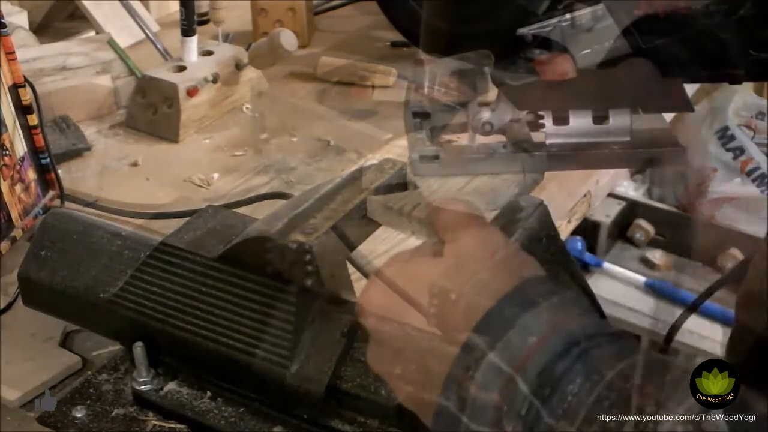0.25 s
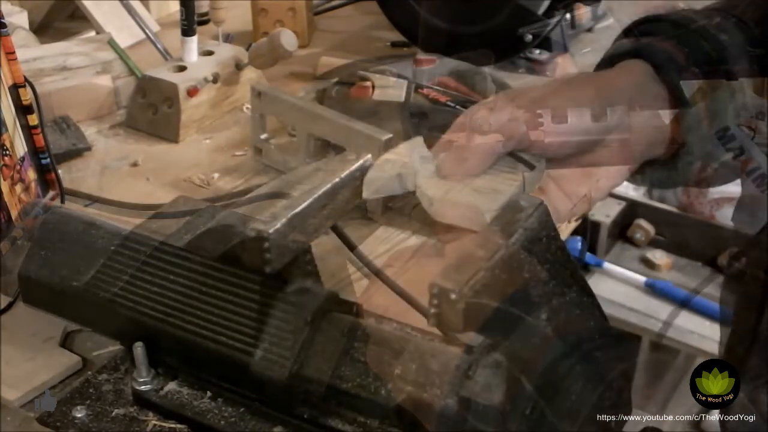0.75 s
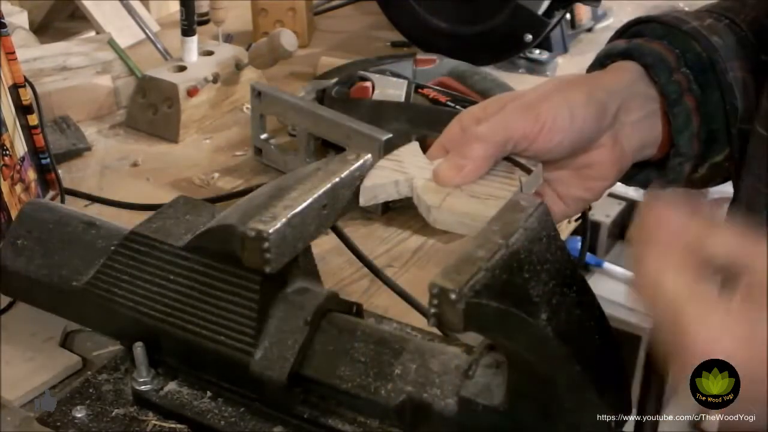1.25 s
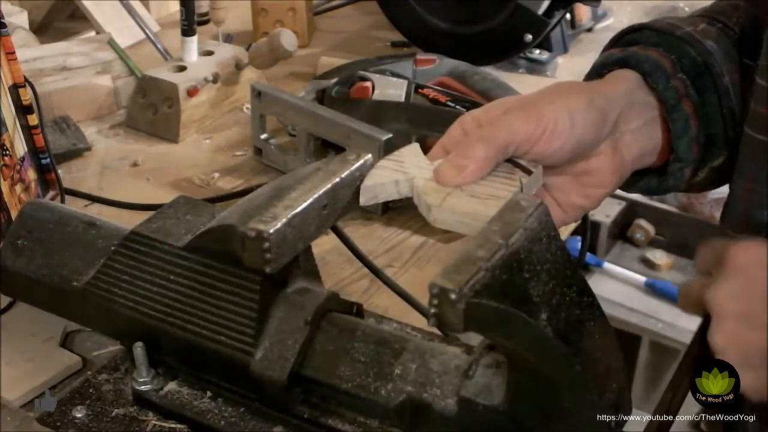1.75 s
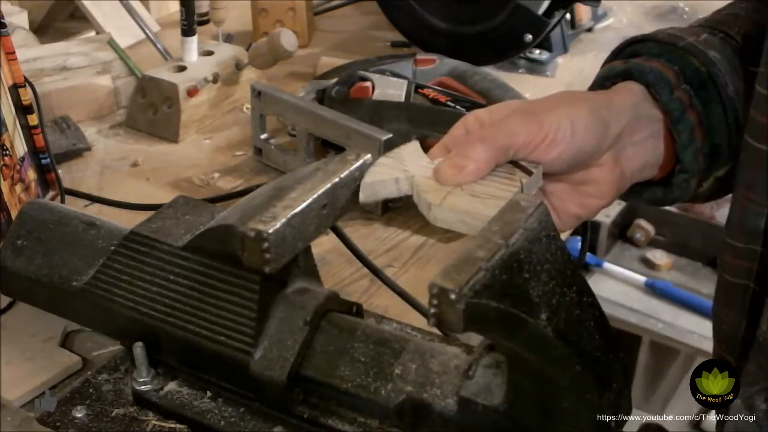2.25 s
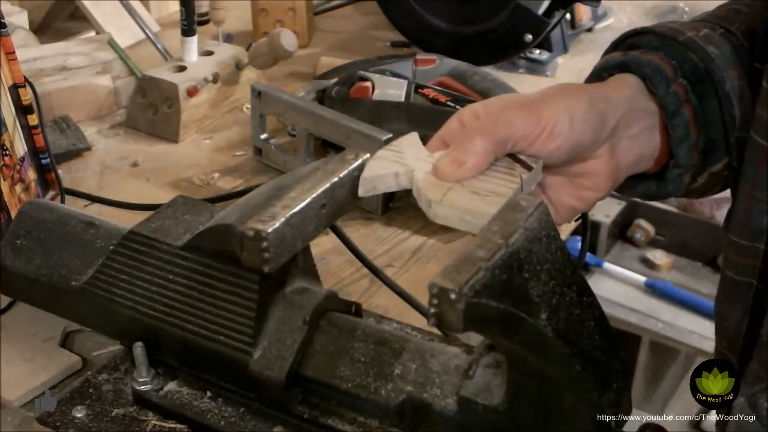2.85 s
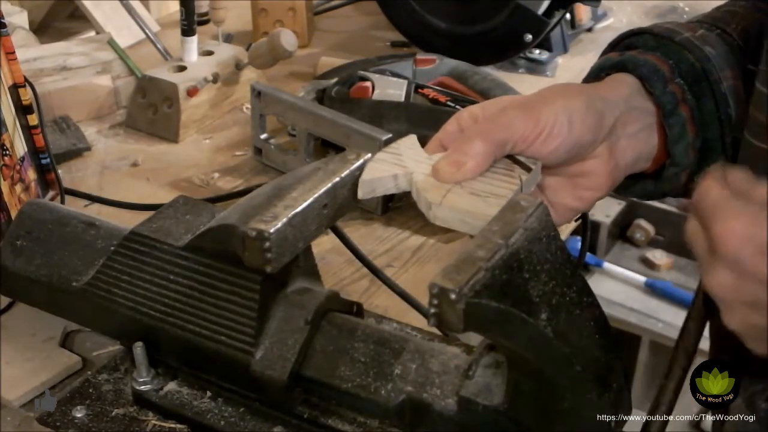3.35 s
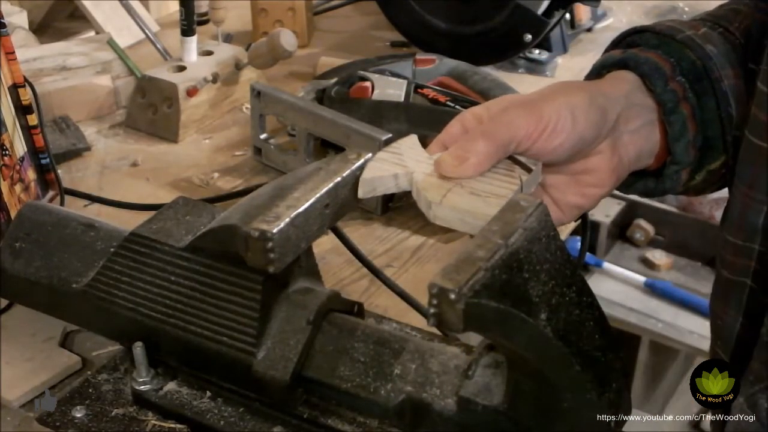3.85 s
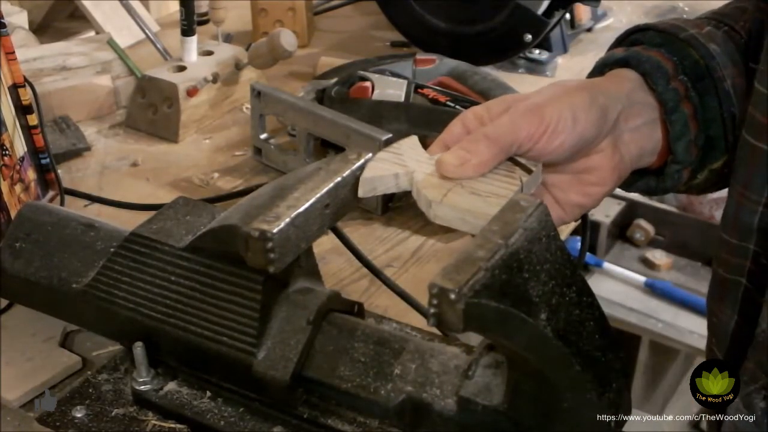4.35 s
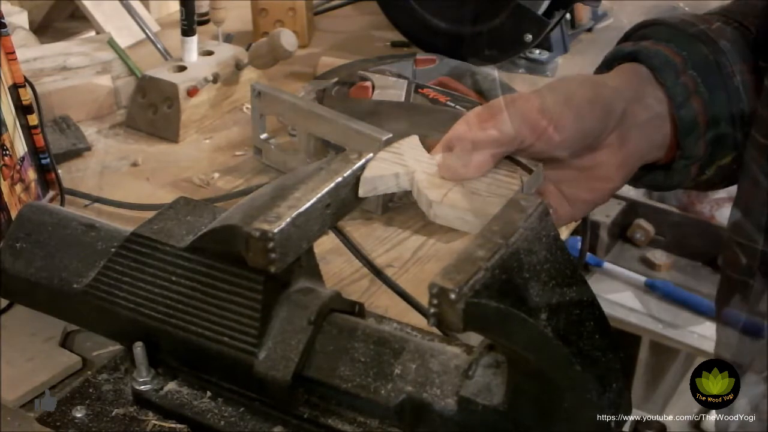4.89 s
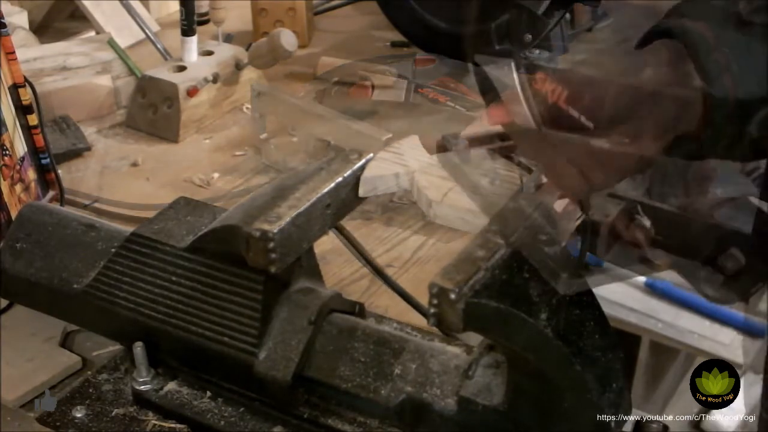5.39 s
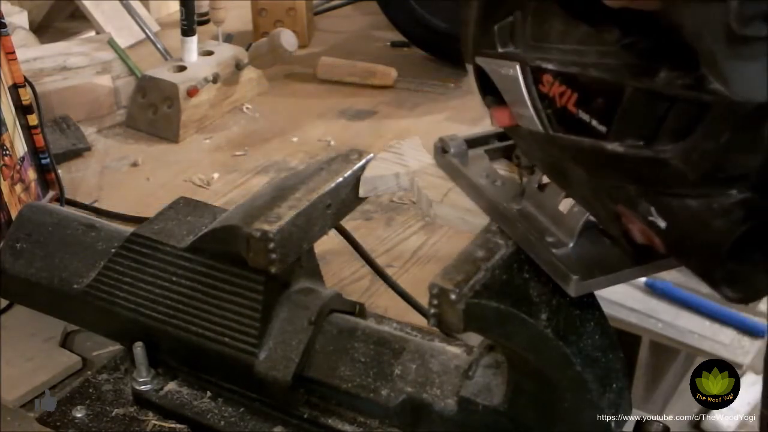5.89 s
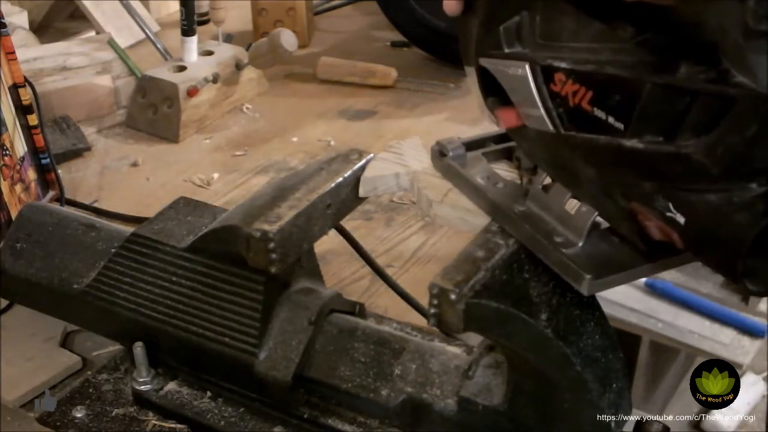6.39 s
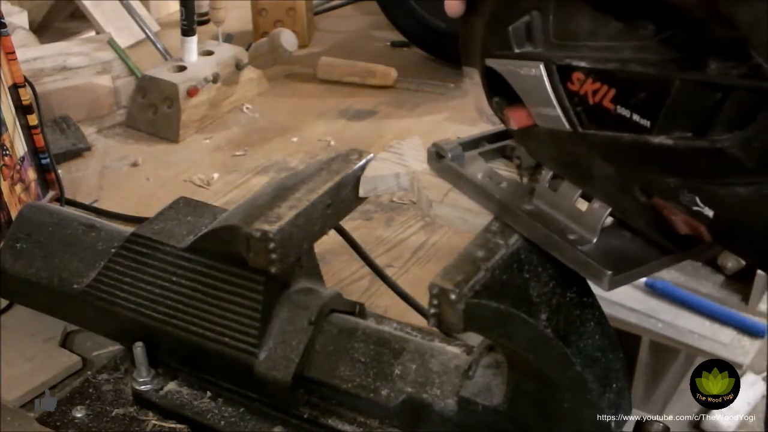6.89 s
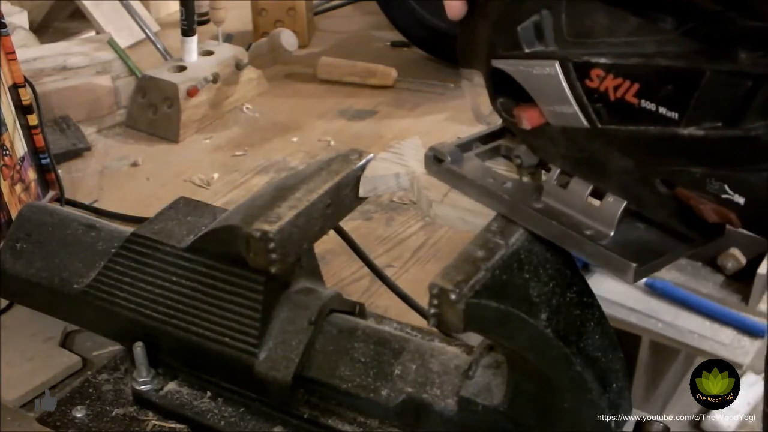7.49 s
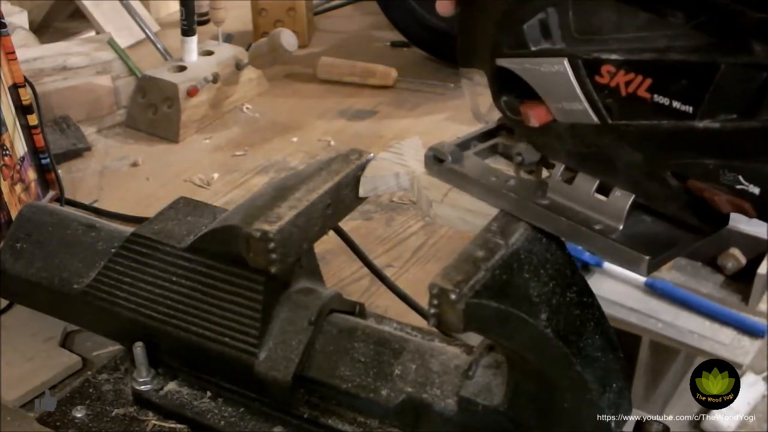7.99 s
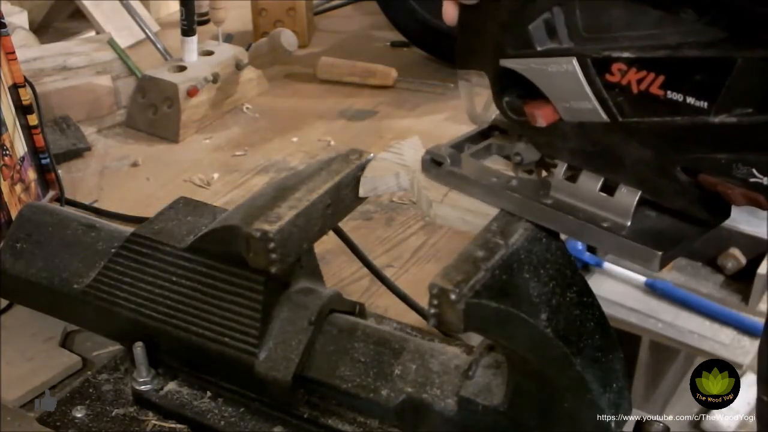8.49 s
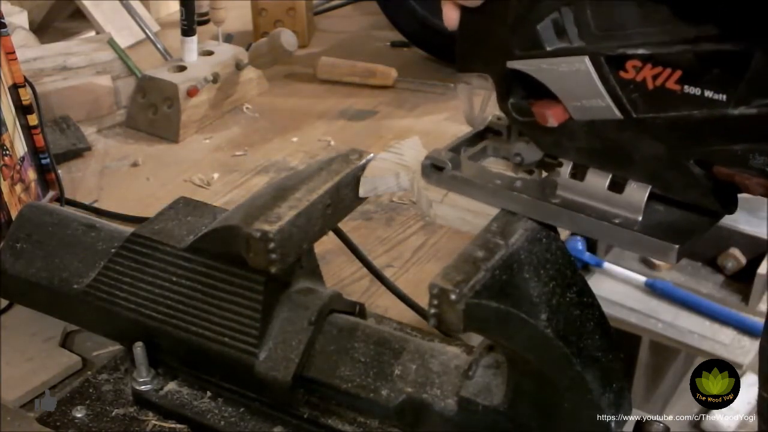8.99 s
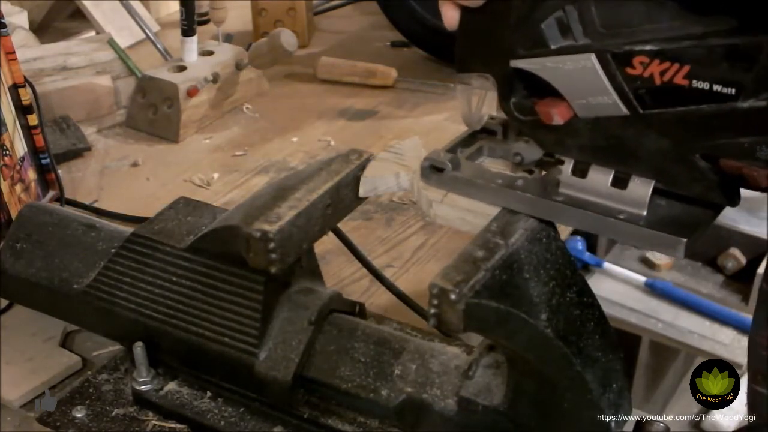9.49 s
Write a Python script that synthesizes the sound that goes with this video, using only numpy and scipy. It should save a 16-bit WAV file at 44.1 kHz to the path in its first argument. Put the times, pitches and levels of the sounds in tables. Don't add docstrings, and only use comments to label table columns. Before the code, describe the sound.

An electric jigsaw bites through thin wood and fades out within a second. In a quiet small workshop, hands tighten a bench vice: dry thread rasps, wood rustles, and several metallic knocks ring briefly. The jigsaw then fades in running free, whining and clattering, its pitch sagging and rising twice as the trigger is released and pulled. Close stereo microphone, work slightly to the right, short room reflections.

```python
import sys
import numpy as np
from scipy import signal
from scipy.fft import rfft, irfft, next_fast_len
from scipy.io import wavfile
from scipy.ndimage import uniform_filter1d, map_coordinates

SR = 44100
rng = np.random.default_rng(int(sys.argv[2]) if len(sys.argv) > 2 else 0)


def natural_amplitude(level_db):
    exponent = np.asarray(level_db, float) / 20
    return 10 ** exponent


def store_wav(level_fs):
    pcm = np.round(np.clip(np.atleast_2d(level_fs), -1, 1) * 32767)
    wavfile.write(sys.argv[1], SR, pcm.T.astype(np.int16))


N = 429534
SIZE = next_fast_len(N + SR)
FREQ = np.maximum(np.arange(SIZE // 2 + 1) * SR / SIZE, 1)
TIME = np.arange(N) / SR

# (frequency [Hz], level [dB per Hz])
AIR = [(21, -41), (35, -10), (58, -5.5), (90, -7.5), (238, -5.5), (350, -6.5), (475, -7.5), (663, -7.5),
       (1050, -9), (1320, -10.5), (2150, -12), (2380, -13), (3000, -15.5), (4630, -19), (15800, -29.5)]
# (frequency [Hz], level [dB])
LAMP = (13550, -90)
# (frequency [Hz], left minus right [dB], share heard alike [0-1])
PORTS = [(100, -.7, .85), (300, -2.7, .95), (800, -4.5, .93), (2000, -8, .74), (3500, -5, .62),
         (7000, -2, .62), (14000, 0, .6)]
# (loudest time [s], level [dB], rise [dB per s])
RUBS = [(1.23, -60, 400), (1.74, -54.5, 264), (1.87, -54, 400), (2.22, -68, 200), (2.31, -60, 1500),
        (3.035, -61, 264), (3.52, -57, 2000), (3.56, -63, 400), (4.6, -60, 600)]
# (time [s], length [s], rasp level [dB])
TURNS = [(1.9, 1.8, -65), (1.995, 0.098, -66), (2.201, 0.046, -66), (2.303, 0.022, -55), (2.46, 0.16, -66),
         (2.578, 0.07, -61), (2.683, 0.042, -56), (2.746, 0.1, -73), (2.854, 0.18, -59),
         (3.113, 0.099, -60), (3.231, 0.1, -57), (3.355, 0.21, -68), (3.66, 0.23, -65), (3.928, 0.23, -63),
         (4.241, 0.08, -61.5), (4.368, 0.028, -62)]
# (frequency [Hz], width [Hz], level [dB])
THREAD = [(2480, 350, 4), (4190, 1600, 5), (4550, 500, 0.5), (5840, 670, 0), (9600, 750, -3),
          (12600, 4000, -10.5)]
# (time [s], peak [dB], loudest ring [Hz], treble share [dB], vice share [dB])
KNOCKS = [(0.986, -44.5, 795, -36, 3), (1.208, -34.5, 680, -11, -7.5), (1.31, -48.5, 840, -12, -6),
          (1.826, -30, 720, -4.5, -2), (1.98, -41, 820, -11, -7), (2.226, -56, 2480, -8, -12),
          (2.302, -48.5, 450, -12, 2), (2.324, -48, 800, -11, 2), (2.364, -58, 880, -14, 0),
          (2.568, -41.5, 776, -13, 2.5), (3.029, -56, 347, -12, -2), (3.512, -53, 398, -11, 6.5),
          (4.088, -30.5, 1220, -6.5, 0.5), (4.587, -47.5, 218, -14, -3.5)]
# (frequency [Hz], width [Hz], level [dB])
VICE = [(263, 53, 3.5), (405, 101, 12.5), (564, 196, 7.5), (768, 220, 6), (1020, 120, -31)]
# (frequency [Hz], width [Hz], level [dB])
HANDLE = [(1760, 150, 9), (2024, 440, 9), (2360, 540, 5.5), (3180, 580, 5), (3940, 270, -3),
          (4270, 460, -2), (6840, 1100, -13)]
CHIMES = [
    (1.209, -46, [(540, -4, .06), (797, -5, .26), (1658, -14, .3), (1900, -3, .06), (2073, -18, .25), (2460, -14, .1), (3600, -6, .04), (3960, -9, .22), (4400, -10, .04)]),
    (1.31, -58, [(1500, -2, .06), (2930, 0, .1)]),
    (1.826, -42, [(361, -6, .4), (802, 0, .25), (1114, -14, .3), (1750, -10, .3), (2449, -12, .2), (3144, -13, .25), (3350, -2, .05), (3700, -8, .05), (4549, -17, .4)]),
    (4.089, -41, [(366, -12, .3), (533, -4, .15), (1040, -6, .3), (1238, 0, .08), (2110, -17, .2), (2455, -12, .3), (2923, -16, .2), (3700, -16, .15), (4600, -18, .15)]),
]
# (time [s], level [dB], frequency [Hz], 60 dB decay [s])
THUDS = [(1.21, -62, 151, 0.44), (1.826, -64, 168, 0.25), (4.089, -62, 196.6, .3), (4.6, -71, 70.6, 0.63)]
# (time [s], shaft speed headed for [turns per s], time to close 63% of the gap [s])
TRIGGER = [
    (0, 325, 1),
    (.14, 421, .35),
    (1.04, 60, 1.6),
    (4.115, 401, .25),
    (5.44, 60, 1.6),
    (6.27, 409.5, .265),
    (8.25, 60, 1.5),
    (8.98, 402, .26),
]
# (time [s], change [percent])
SURGE = [(5.4, 0), (5.6, -.25), (5.78, 0), (6.05, .55), (6.24, .2), (6.36, .8), (6.5, .2), (6.62, -.4),
         (6.85, -.5), (7.08, 0), (7.4, .1), (7.9, -.15), (8.2, 0), (8.28, .25), (8.42, -.25), (8.76, .75),
         (8.92, .45), (9.1, 1.4), (9.24, .7), (9.48, -.35), (9.74, -.9)]
# (time [s], level [dB])
NEARER = [(0, 1), (.5, -2.5), (5, -0.5), (6.2, 0.5), (7.6, -1), (8.6, -1.5), (9.3, 0), (9.74, -0.5)]
# (time [s], level [dB])
FACING = [
    [(0, -10), (.3, -3), (.6, -1), (1.04, -4)],
    [(4.4, -10), (5, -5), (5.9, -1), (6.4, -2), (6.75, -5), (7.2, 0), (8.3, -1), (9, -2), (9.74, -1)],
]
# (frequency [Hz], level [dB per Hz])
HOUSING = [(59, -56), (100, -24.5), (140, -31), (219, -23.5), (379, -13), (478, -15.5), (800, -13.5),
           (1010, -14.5), (1440, -5.5), (2050, -1), (2280, -2.5), (3320, -6.5), (6070, -11.5), (7000, -11),
           (9100, -19), (15400, -120)]
# (frequency [Hz], width [Hz], level [dB])
RINGS = [(776, 290, 4.5), (1480, 220, 1), (2200, 200, 0.5), (3290, 180, 2.5)]
# (frequency [Hz], level [dB per Hz])
FAN = [(2600, -26), (4500, -7.5), (6400, -15), (7100, -8.5), (10200, -5), (12700, -4), (14600, -9.5),
       (15700, -15)]
# (multiple of shaft speed, level [dB], best radiated [Hz], width [Hz])
WHINE = [(1, -19, 405, 50), (2, -24, 815, 70), (4, -8.5, 1640, 300), (5, -9, 1950, 900)]
# (multiple of shaft speed, level [dB], best radiated [Hz], width [Hz])
BARS = [(12, -16, 4500, 1400), (24, -13, 7000, 1300), (36, -14.5, 13200, 7000), (48, -15, 14500, 2400)]
# (time [s], fourth multiple [dB], fifth multiple [dB], sole-plate buzz [dB])
MESH = [
    [(0, -8, 7, -15), (.25, 6, 6, -18), (.4, 3, 4, -15), (.7, -3, 1, -11), (1.04, 11, 6, 0)],
    [(4.4, 2, -8, -23), (5.1, -4, 3, -25), (5.4, 0, 2, -18), (5.65, 3, -1, -20), (5.9, -3, 5, -28),
     (6.15, 0, -4, -26), (6.5, 6, 5, -24), (6.8, -2, -1, -12), (6.97, -6, 5, -13), (7.2, 0.5, 5.5, -19),
     (7.6, 3, 3.5, -13), (8.2, 5, 0.5, -9), (8.45, -1, 0, -18), (8.8, 1, 1, -24), (9.1, 4, 2, -15),
     (9.4, 2.5, -1, -7), (9.74, -2, 3, -11)],
]
# (time [s], twelfth multiple [dB], thirty-sixth multiple [dB])
BRUSHES = [
    [(0, -2, -3), (.4, 2, 3), (.75, 4, 3), (1.04, -2, -2)],
    [(4.4, 3, 2), (5.1, 7, 2), (5.3, 0, 0), (5.55, 0, 3), (6, -6, 0), (6.45, 2, 3), (6.8, 6, 7),
     (7.05, 0, 5), (7.35, -9, 6), (7.7, -8, -2), (8.2, -2, -5), (8.5, -5, 0), (8.8, -7, 2), (9.2, -6, -2),
     (9.74, -7, -7)],
]
# (frequency [Hz], width [Hz])
PLATE = (2070, 160)
# (multiple of stroke rate, level [dB])
SHAKE = [(1, -41), (2, -42), (3, -41), (4, -44), (5, -40.5), (6, -40.5), (7, -41), (8, -39.5)]
# (frequency [Hz], width [Hz], level [dB])
BENCH = (108, 12, 10)
# (time [s], bite over the housing [dB])
BITE = [
    [(0, -10), (.08, -4), (.2, 0), (.33, -1), (.43, -6), (.55, -11), (1.04, -13)],
    [(4.4, -16), (6.3, -16), (7.5, -16), (9, -16), (9.74, -15)],
]
# (frequency [Hz], width [Hz], level [dB])
BLADE = [(1466, 370, -0.5), (1760, 300, 4), (2820, 1080, 1), (5520, 780, -2.5), (6560, 1500, -10.5)]
# (time [s], place in the stroke [0-1], upper end [dB], lower end [dB], over the housing)
CLACKS = [
    [(0, .11, -13, -14), (.25, .13, -8, -13), (.4, .13, -10, -13), (.6, .14, -12, -10),
     (1.04, .15, -14, -11)],
    [(4.4, .965, -6, -9), (5.6, .965, -8, -12), (6.2, .99, -9, -10), (6.6, .99, -9.5, -11),
     (7.3, .97, -9, -15), (8.2, .96, -9, -16), (8.5, .98, -8, -11), (9, .99, -9, -11),
     (9.74, .99, -10.5, -15)],
]
# (frequency [Hz], width [Hz], level [dB])
YOKE = [(1660, 840, -2), (2900, 2400, 1), (4210, 2200, -1.5), (7900, 1800, -1.5), (11500, 6500, -4)]

STROKES_PER_TURN = 5 / 46
FULL_HZ = 400


def unit(x):
    return x / np.sqrt(np.mean(x ** 2))


def noise():
    return rng.standard_normal((3, N))


def walk(rate):
    k = int(SR / rate)
    steps = np.repeat(rng.standard_normal(N // k + 1), k)
    return 1.32 * uniform_filter1d(uniform_filter1d(steps, k), k)[:N]


def ramp(start, length):
    return np.clip((TIME - start) / length, 0, 1)


def play(tables, k, silent=-120):
    out = np.full(N, float(silent))
    for rows in map(np.array, tables):
        inside = (TIME >= rows[0, 0]) & (TIME <= rows[-1, 0])
        out[inside] = np.interp(TIME[inside], rows[:, 0], rows[:, k])
    return out


def along(table, k=1):
    rows = np.array(table)
    return np.interp(np.log(FREQ), np.log(rows[:, 0]), rows[:, k])


def shape(x, gain):
    return irfft(rfft(x, SIZE) * gain, SIZE)[..., :N]


def ring(hz, width):
    return 1 / (1 + 1j * (FREQ / hz - hz / FREQ) * hz / width)


def rings(modes):
    return sum(natural_amplitude(db) * ring(f, w) ** 2 for f, w, db in modes)


def background_gain():
    fade_s, under_saw_db = 0.99, -8.5
    up = ramp(0, fade_s) - ramp(4.25, fade_s / 2)
    return natural_amplitude(under_saw_db) + (1 - natural_amplitude(under_saw_db)) * up


def room_tail(t60):
    t = np.arange(SR // 2) / SR
    echo = rng.standard_normal((2, len(t))) * np.exp(-np.log(1000) * t / t60)
    return rfft(echo / np.sqrt(np.sum(echo ** 2, axis=1, keepdims=True)), SIZE)


def air():
    mid, side = shape(rng.standard_normal((2, N)), natural_amplitude(along(AIR)))
    side = shape(side, FREQ / (FREQ + 120))
    return unit(np.array([mid + side, mid - side])) * natural_amplitude(-63 + 0.8 * walk(3.7))


def lamp():
    hz, db = LAMP
    return natural_amplitude(db) * np.sin(2 * np.pi * hz * TIME)


def shuffle():
    trim_db, rustle_db, fall_db_s = -2, -77.5, 148
    rub = unit(shape(noise() * natural_amplitude(4.3 * walk(40)), ring(300, 350) ** 2))
    level = natural_amplitude(rustle_db) * background_gain()
    for s, db, rise_db_s in RUBS:
        level = level + natural_amplitude(db - np.maximum((s - TIME) * rise_db_s, (TIME - s) * fall_db_s))
    return rub * natural_amplitude(trim_db) * level


def screw():
    trim_db, edge_s = -6.5, 0.0052
    grains = noise() * natural_amplitude(2 * walk(150) + 2 * walk(29.83))
    level = sum(natural_amplitude(db) * (ramp(s, edge_s) - ramp(s + length, edge_s)) for s, length, db in TURNS)
    return unit(shape(grains, rings(THREAD))) * natural_amplitude(trim_db) * level


def knocks():
    crack_ms, tail_db, handle_db, trim_db = 7, -7, 9, -10
    low_t60_s, high_t60_s = 0.32, 0.32 * 0.37
    low, high, own = np.zeros((3, 3, N + SR))
    t = np.arange(SR // 2) / SR
    crack = np.exp(-t * 1000 / crack_ms)
    for s, db, hz, treble_db, vice_db in KNOCKS:
        at = slice(int(s * SR), int(s * SR) + len(t))
        grain = rng.standard_normal((3, len(t))) * natural_amplitude(db) * np.minimum(t * 700, 1)
        slow = grain * (crack + natural_amplitude(tail_db - 60 * t / low_t60_s))
        quick = grain * (crack + natural_amplitude(tail_db - 60 * t / high_t60_s))
        low[:, at] += natural_amplitude(vice_db) * slow
        high[:, at] += natural_amplitude(treble_db + handle_db) * quick
        peak = signal.iirpeak(hz, 1.8, SR)
        own[:, at] += signal.lfilter(*peak, signal.lfilter(*peak, slow)) / np.sqrt(hz / SR)
    vice, handle = rings(VICE), rings(HANDLE)
    struck = shape(low, vice / np.std(vice)) + shape(high, handle / np.std(handle))
    return natural_amplitude(trim_db) * (struck + own[:, :N])


def chimes():
    flutter_db, longest_s = 3, 0.4
    out = np.zeros((3, N))
    thuds = [(s, db, [(hz, 0, t60)]) for s, db, hz, t60 in THUDS]
    for s, db, modes in CHIMES + thuds:
        first = int(s * SR)
        t = np.arange(min(SR, N - first)) / SR
        for hz, mode_db, t60 in modes:
            start = 2 * np.pi * rng.random((3, 1))
            decay_s = np.clip(t60, .02, max(longest_s, 100 / hz))
            level = natural_amplitude(db + mode_db - 60 * t / decay_s) * np.minimum(t * hz, 1)
            out[:, first:first + len(t)] += level * np.sin(2 * np.pi * hz * t + start)
    return out * natural_amplitude(flutter_db * walk(160))


def speed():
    hz, now = np.zeros(N), TRIGGER[0][1]
    ends = [row[0] for row in TRIGGER[1:]] + [N / SR]
    for (s, goal, settle), end in zip(TRIGGER, ends):
        hz = np.where(TIME >= s, goal + (now - goal) * np.exp(-(TIME - s) / settle), hz)
        now = goal + (now - goal) * np.exp(-(end - s) / settle)
    return hz * (1 + np.interp(TIME, *zip(*SURGE)) / 100)


def saw_gain(hz):
    first = natural_amplitude(-34) * (1 - ramp(0, 0.99)) ** 0.76
    second = natural_amplitude(-39) * ramp(4.408, 5.49) ** 0.85
    louder_db = 1.5 * np.log2(hz / FULL_HZ)
    return (first + second) * natural_amplitude(np.interp(TIME, *zip(*NEARER)) + louder_db)


def worn_teeth(strokes):
    teeth = signal.lfilter([1], [1, -.9], rng.standard_normal((500, 1024)), axis=0)
    return unit(map_coordinates(teeth, [strokes, strokes % 1 * 1023], order=1))


def gear_clatter(strokes, worn):
    repeat, sag_db = 0.072, 2.5
    clatter = np.sqrt(repeat) * worn + np.sqrt(1 - repeat) * noise()
    body = natural_amplitude(along(HOUSING)) * (1 + sum((natural_amplitude(db) - 1) * ring(f, w) for f, w, db in RINGS))
    housing = unit(shape(clatter * natural_amplitude(0.15 * walk(9.9) + 0.83 * walk(180)), body))
    return housing * natural_amplitude(sag_db * (.5 - (strokes - play(CLACKS, 1, 0)) % 1))


def clacks(strokes, worn):
    decay_ms, scatter_db, slack = 1.3, 1.3, .012
    place = 2 * (strokes - play(CLACKS, 1, 0)) + 2
    end = np.round(place).astype(int)
    size, late = rng.standard_normal((1000, 2)).T
    hit = np.diff((place - 2 * slack * late[end]) // 1, prepend=0) > 0
    end_db = np.where(end % 2, play(CLACKS, 3), play(CLACKS, 2))
    force = hit * natural_amplitude(scatter_db * size[end] + end_db)
    decay = signal.lfilter([1], [1, -np.exp(-1000 / decay_ms / SR)], force)
    yoke = rings(YOKE)
    tick = shape((0.5 * worn + 0.59 * noise()) * decay, yoke)
    return tick * np.sqrt(50 / decay_ms / np.mean(np.abs(yoke) ** 2))


def bite_pulse(place):
    scatter_db, width = 1.8, .07
    size = natural_amplitude(scatter_db * rng.standard_normal(500))[place.astype(int)]
    return size * np.exp(-((place % 1 - .5) / width) ** 2 / 2)


def blade_cut(pulse, worn):
    return unit(shape((worn + .5 * noise()) * pulse, rings(BLADE)))


def plank_boom(place):
    return natural_amplitude(-8) * unit(shape(noise() * np.cos(np.pi * place) ** 2, ring(828, 83)))


def fan_hiss(hz):
    fan = unit(shape(noise() * natural_amplitude(1.0 * walk(10) + 1.04 * walk(150)), natural_amplitude(along(FAN))))
    return natural_amplitude(-5 + 2 * np.log2(hz / FULL_HZ)) * fan


def shaft_tone(hz, turns, multiple, db, best_hz, width_hz):
    pitch = multiple * hz
    radiated = (pitch < .4 * SR) / np.hypot(1, 2 * (pitch - best_hz) / width_hz)
    return natural_amplitude(db + .8 * walk(28)) * radiated * np.sin(2 * np.pi * multiple * turns)


def motor_whine(hz, turns, place):
    throb = 1 - 0.12 * (np.cos(2 * np.pi * place) + .5 * np.cos(4 * np.pi * place))
    mesh = [1, 1, natural_amplitude(play(MESH, 1)), natural_amplitude(play(MESH, 2))]
    brush = [natural_amplitude(play(BRUSHES, 1)), 1, natural_amplitude(play(BRUSHES, 2)), 1]
    gears = sum(gain * shaft_tone(hz, turns, *row) for gain, row in zip(mesh, WHINE))
    brushes = sum(gain * shaft_tone(hz, turns, *row) for gain, row in zip(brush, BARS))
    return natural_amplitude(play(FACING, 1)) * (throb * gears + brushes)


def plate_buzz():
    return natural_amplitude(play(MESH, 3)) * unit(shape(noise(), ring(*PLATE) ** 2))


def bench_shake(strokes):
    shake = sum(natural_amplitude(db + 2.5 * walk(6.4)) * np.sin(2 * np.pi * k * strokes + k * k) for k, db in SHAKE)
    hz, width, db = BENCH
    return shape(shake, 1 + natural_amplitude(db) * ring(hz, width))


def jigsaw():
    hz = speed()
    turns = np.cumsum(hz) / SR + .001 * walk(40)
    strokes = turns * STROKES_PER_TURN + 1
    place = strokes - .945 + .5
    worn = worn_teeth(strokes)
    bite, pulse = natural_amplitude(play(BITE, 1)), bite_pulse(place)
    gears = gear_clatter(strokes, worn) / np.hypot(1, bite) + clacks(strokes, worn) + plate_buzz()
    wood = bite * (blade_cut(pulse, worn) + plank_boom(place))
    whine = motor_whine(hz, turns, place) * (1 + 2.1 * bite * pulse) / (1 + bite)
    shake = bench_shake(strokes) / (1 + bite)
    return saw_gain(hz) * (gears + wood + fan_hiss(hz) + whine + shake)


def scene():
    near = jigsaw() + knocks() + chimes() + screw() + shuffle()
    alike = np.clip(along(PORTS, 2), 0, 1)
    room = natural_amplitude(-7.5) * room_tail(0.34) / np.hypot(1, FREQ / 4000)
    lag_s = 2.3e-5 * np.array([[-.5], [.5]])
    lean = natural_amplitude(np.outer([.5, -.5], along(PORTS))) * np.exp(2j * np.pi * FREQ * lag_s)
    heard = shape(near[0], (alike + room) * lean) + shape(near[1:], np.sqrt(1 - alike ** 2) * lean)
    return heard + background_gain() * air() + lamp()


def low_pass(x):
    return signal.sosfilt(signal.butter(12, 16120, fs=SR, output="sos"), x)


def record(dry):
    top = signal.ellip(8, .2, 60, 15650, fs=SR, output="sos")
    mix = signal.sosfilt(top, dry)
    return low_pass(mix)


dry = scene()
out = record(dry)
store_wav(out)
```